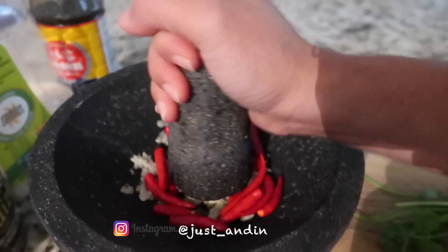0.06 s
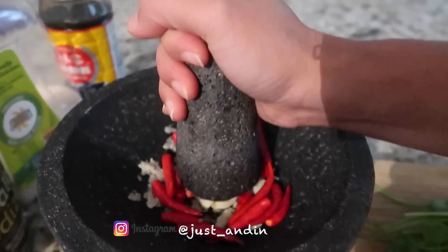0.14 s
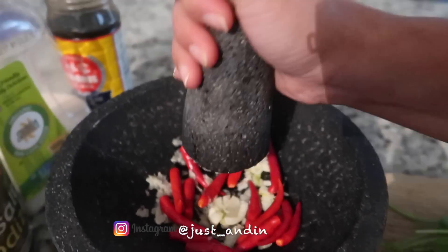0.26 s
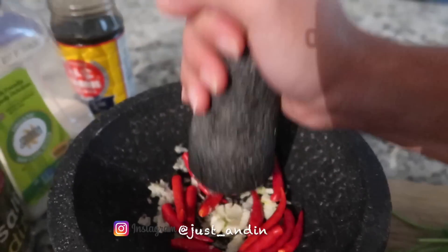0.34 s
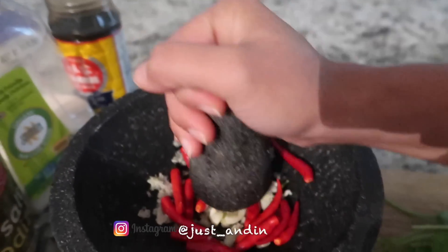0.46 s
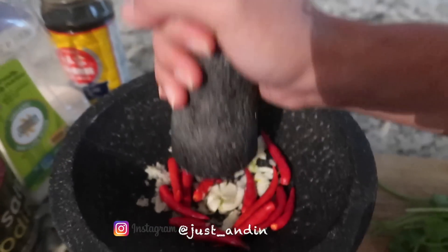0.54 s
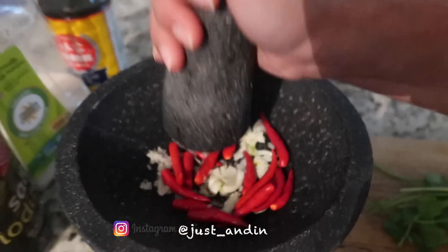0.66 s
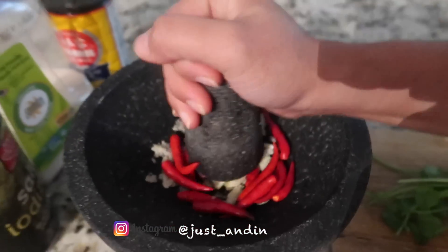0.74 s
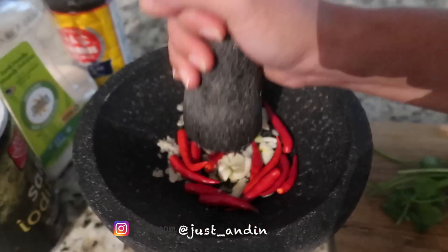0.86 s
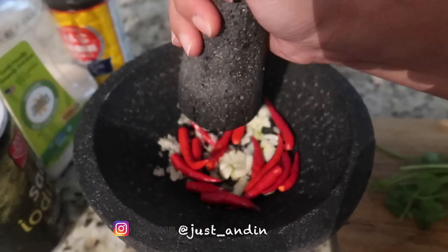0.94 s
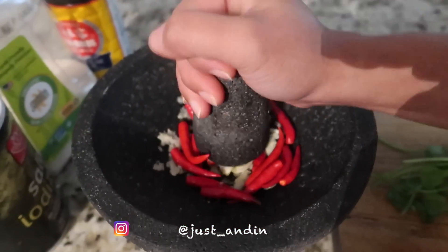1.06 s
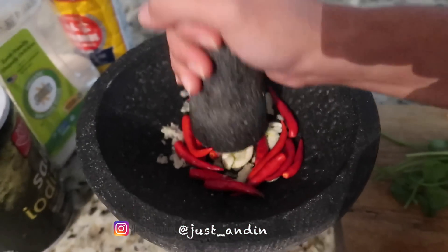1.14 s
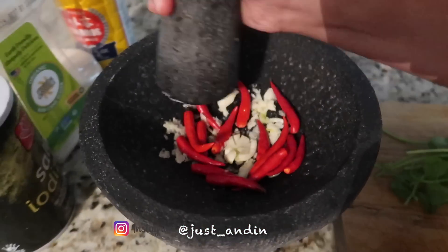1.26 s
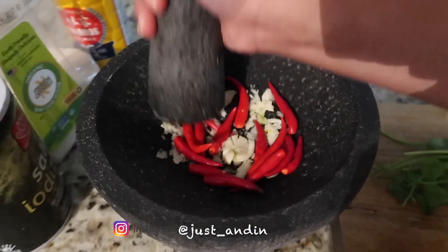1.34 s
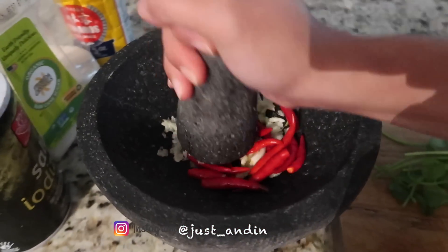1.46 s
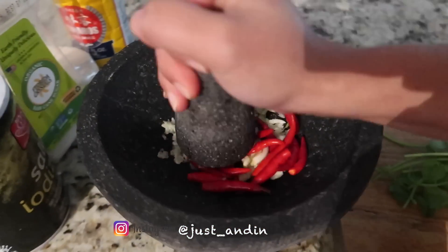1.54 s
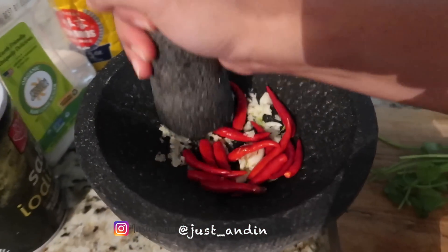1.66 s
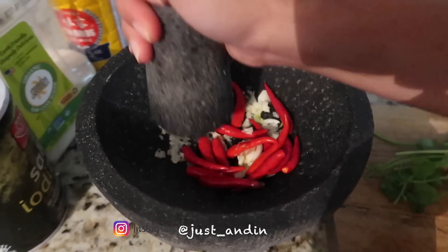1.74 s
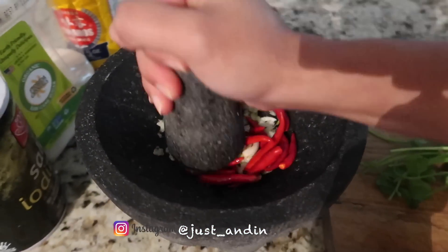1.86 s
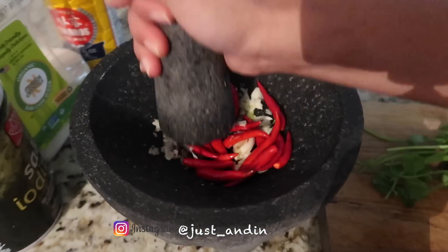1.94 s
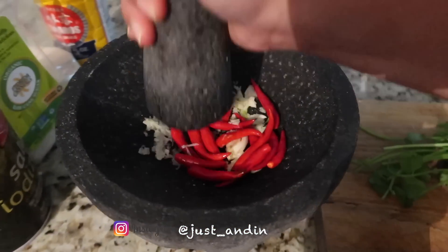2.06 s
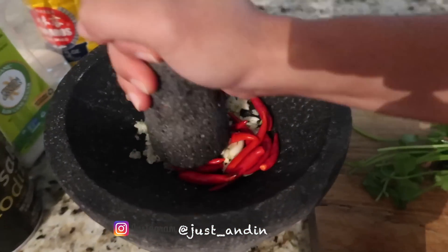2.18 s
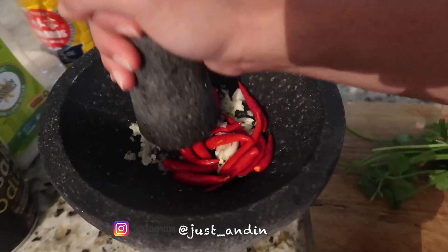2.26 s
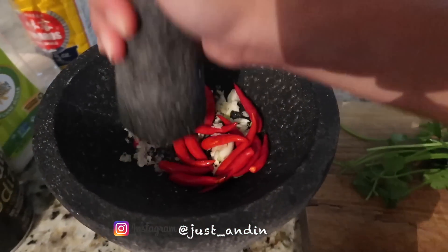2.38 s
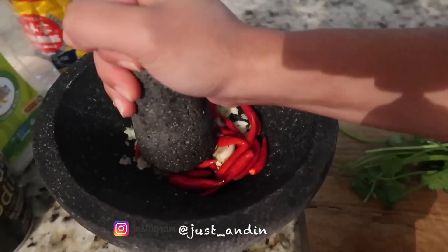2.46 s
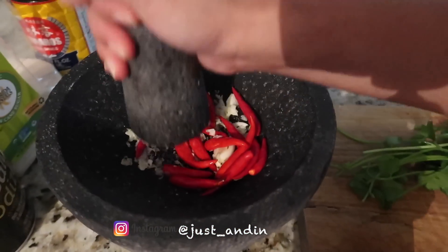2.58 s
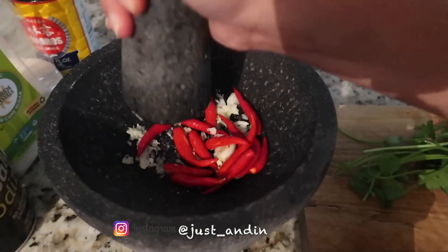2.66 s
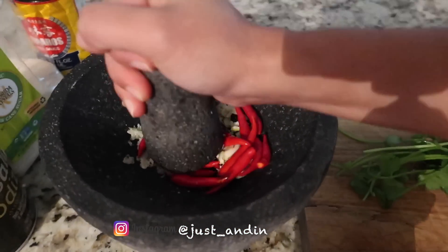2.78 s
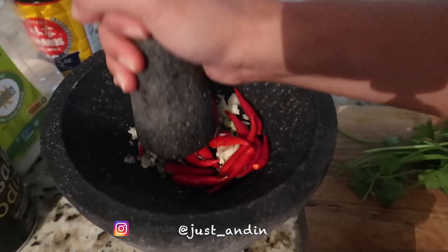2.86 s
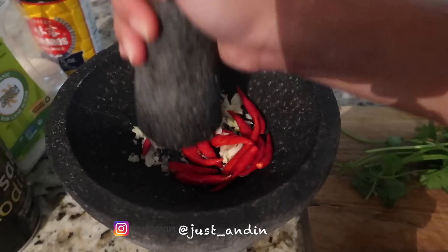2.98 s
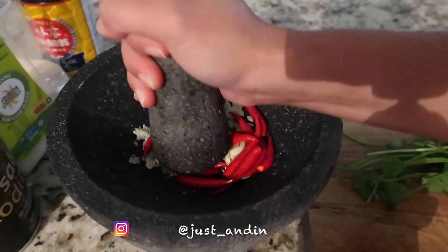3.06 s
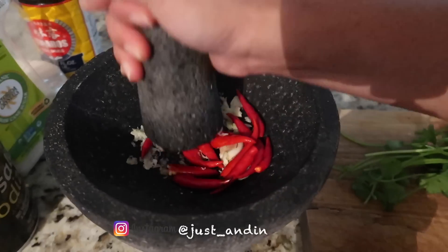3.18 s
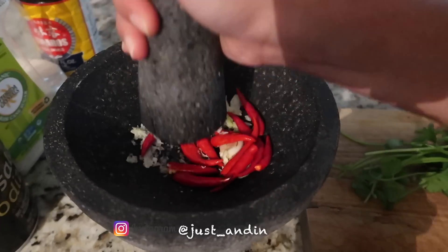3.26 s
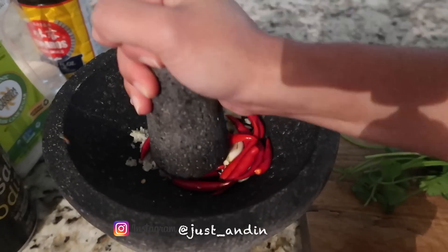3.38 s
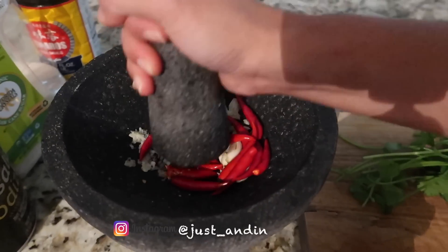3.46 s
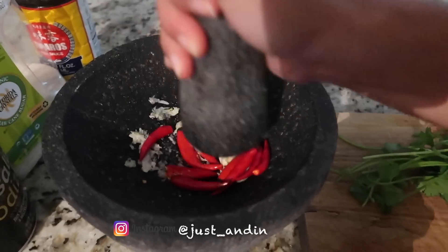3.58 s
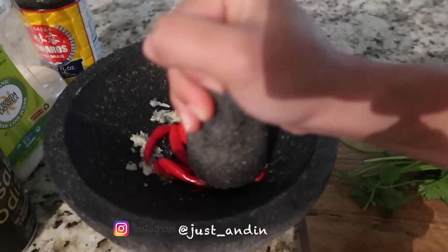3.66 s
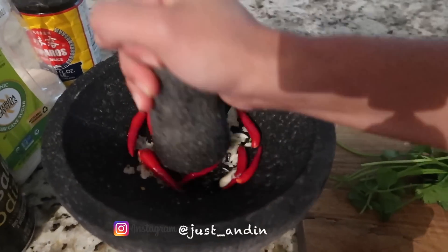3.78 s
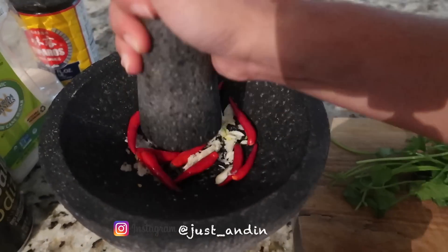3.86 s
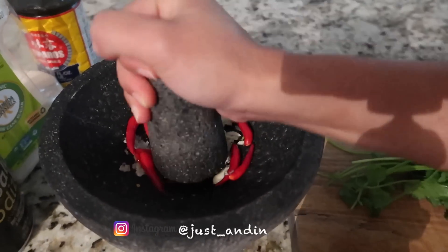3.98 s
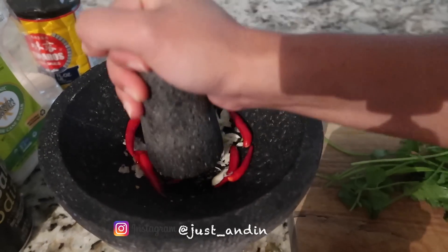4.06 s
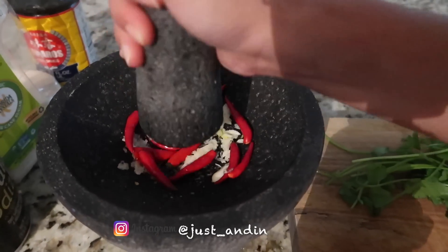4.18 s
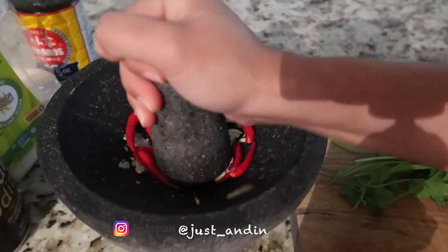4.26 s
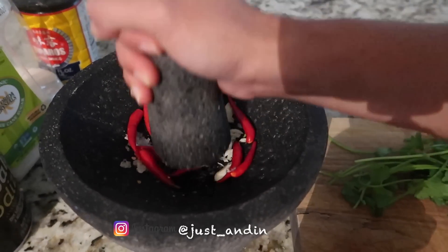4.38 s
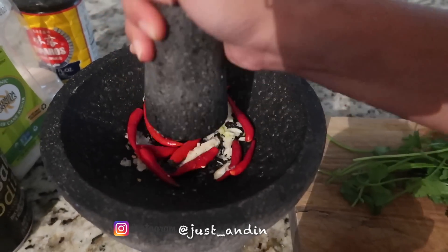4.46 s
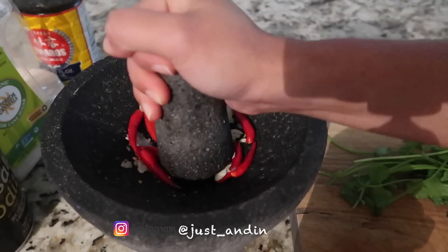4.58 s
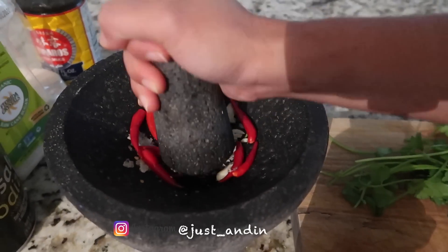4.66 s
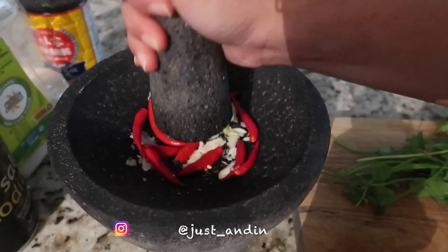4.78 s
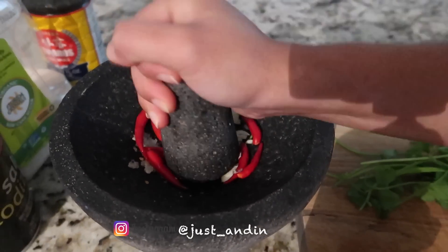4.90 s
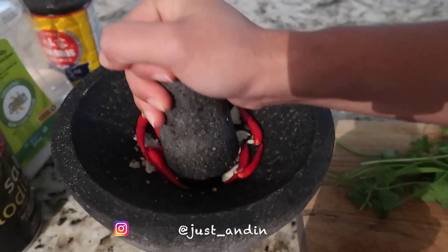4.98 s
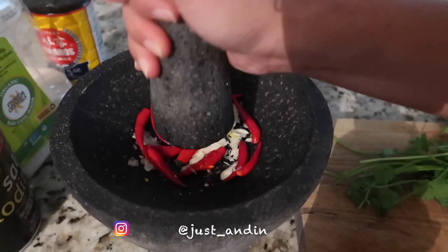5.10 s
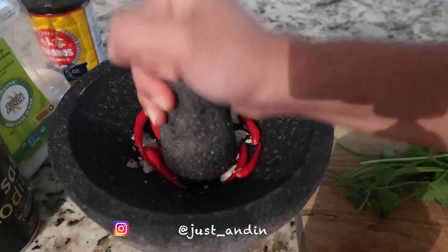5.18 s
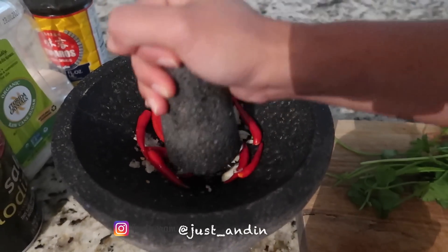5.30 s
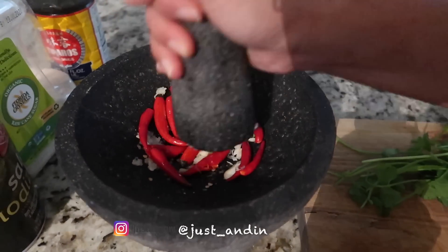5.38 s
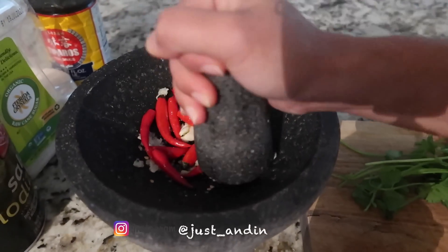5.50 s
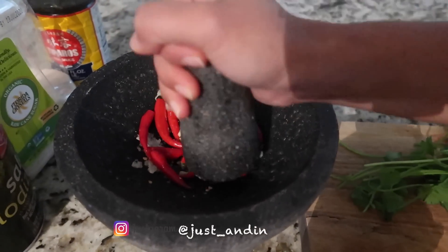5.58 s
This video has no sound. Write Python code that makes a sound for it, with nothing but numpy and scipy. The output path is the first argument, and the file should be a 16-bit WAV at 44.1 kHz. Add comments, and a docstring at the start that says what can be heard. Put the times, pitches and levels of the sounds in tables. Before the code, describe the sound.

A stone pestle pounds chilies and garlic in a stone mortar on a wooden board, close by in a kitchen. From about 0.2 to 1.2 seconds come four dull thuds, each with a crisp crunch or snap of skins and a brief low hum from the board; the pestle scrapes softly around 0.7. In a short break near 1.5 seconds, wet pulp fizzes and seeds pop faintly. Pounding resumes at 1.9 with a sharp stone clack and continues at about three blows a second, growing heavier up to 3.4. A loud clack of bare stone comes at 3.8 with a little wet crackle, followed by lighter blows and a bright snap at 4.4. The heaviest thuds land at 5.0 and 5.3, and a last loud clack at 5.6. A short room echo follows each blow over a quiet low hum.

```python
"""A stone pestle pounds chilies and garlic in a stone mortar on a wooden board, close by in a kitchen.
Each blow first crushes the pulp, then shoves the mortar down with a dull thud. Now and then stone hits
bare stone and the bowl clacks, three times loudly. Between blows the pestle rubs and the wet pulp
crackles. Walls and cabinets echo over a quiet room hum."""
import sys
import numpy as np
from scipy import signal
from scipy.fft import rfft, irfft, next_fast_len
from scipy.io import wavfile
from scipy.ndimage import map_coordinates

SR = 44100
rng = np.random.default_rng(int(sys.argv[2]) if len(sys.argv) > 2 else 0)


def persist_wave(psi):
    """Save psi, clipped to +-1, as 16-bit WAV."""
    counts = np.round(np.clip(psi, -1, 1) * 32767).astype(np.int16)
    wavfile.write(sys.argv[1], SR, np.atleast_2d(counts).T)


N = 248724

# Pestle blows: time_s, thud_db, crunch_db, crunch_body_db, crunch_fizz_db, crunch_pitch_hz
BLOWS = [(0.159, -9.5, -17, 4.5, -3, 3550), (0.4903, -16, -27.5, 11, 5, 3630),
         (0.8388, -15.5, -16, 0.5, -17, 4270), (1.151, -13, -21, 8.5, -3.5, 4870),
         (1.9183, -20, -20, 4.5, 0, 4000), (2.2287, -10, -22.5, 2, 3, 4200),
         (2.5308, -11.5, -15, 3.5, 0, 3170), (2.841, -8, -18, 0.5, -4.5, 6400),
         (3.1335, -7, -21.5, 6, 3.5, 3430), (3.4338, -5.5, -21.5, 3.5, 3.5, 3100),
         (3.752, -21, -40, 11.5, 7, 4230), (4.0824, -20, -27, -1.5, -1.5, 4015),
         (4.3648, -18, -15, 2, -16, 3380), (4.6583, -10.5, -27.5, 6.5, 1.5, 3900),
         (5.008, -5.5, -25, 17, 0.5, 3395), (5.2972, -4.5, -19.5, 12, 1.5, 3860),
         (5.595, -13.5, -28, 7, -3, 3950)]
def thuds(rise=3.94, release=0.93, board_hz=92, board_width_hz=60):
    """Force builds as the pulp packs, then lets go faster; the springy board turns that into a thud."""
    out, ms = np.zeros(N), window_ms()
    for time_s, thud_db, *_ in BLOWS:
        contact = contact_ms(time_s, thud_db)
        force = np.exp(-np.logaddexp(-2 * ms / (rise * contact), 2 * ms / (release * contact)))
        push = np.gradient(force)  # only a changing force makes sound
        add(out, time_s, amp(thud_db) * push / -push.min())
    return filtered(out, lambda hz: resonance(hz, board_hz, board_width_hz) * 1j * hz / board_width_hz)


def contact_ms(time_s, level_db, fresh_ms=1.42, medium_db=-13, hardening=0.62, thinning_per_s=0.063):
    """How long the pulp cushions a blow: shorter when hit harder, and as pounding thins it."""
    return fresh_ms * amp(-hardening * (level_db - medium_db)) * np.exp(-thinning_per_s * time_s)


# Tone of crushed skins and fibres: frequency_hz, level_db
CRUNCH_TONE = [(300, -6.5), (900, -7.5), (2300, -10), (3100, 1), (4000, -4.5), (5200, -4.5), (7000, -6),
               (8200, -11), (10000, -18), (12500, -20.5), (16000, -30)]
def crunches(build_ms=1.28, stop_ms=0.98, touch_ms=6.5, lead_contacts=1.35):
    """From first touch, skins break ever faster until the pulp is packed, just before the force peaks."""
    out, ms = np.zeros(N), window_ms()
    touching = np.clip(ms + touch_ms, 0, 1)
    swell = np.exp(-np.logaddexp(-ms / build_ms, ms / stop_ms))
    faint_edges = amp(-21) * np.exp(-abs(ms) / 4)
    burst = touching * (swell + faint_edges)
    for time_s, thud_db, crunch_db, body_db, fizz_db, pitch_hz in BLOWS:
        crack = coloured(burst * grains(len(ms), spread_db=2), CRUNCH_TONE)
        crack = unit(peaked(crack, pitch_hz, width_hz=900, peak_db=-2))
        crack = coloured(crack, [(1500, body_db), (2800, 0.0067), (6500, 0.0087), (9500, fizz_db + 6)])
        early_s = lead_contacts * contact_ms(time_s, thud_db) / 1000
        add(out, time_s - early_s, amp(crunch_db - 11) * crack)
    return out


# Single skins bursting under a blow: start_s, level_db, pitch_hz, fade_cycles
SKIN_SNAPS = [(0.4798, -17, 2200, 0.66), (0.8355, -1.5, 4100, 1.35), (0.843, -7.5, 4230, 1.2),
              (1.1488, -2, 3130, 1.7), (1.1496, 5, 5260, 1.5), (1.156, -8.5, 4370, 1.1),
              (1.9162, 3, 5430, 1.36), (2.2223, -10, 4050, 0.6), (2.5291, -1, 8200, 3.1),
              (2.5286, -8, 3320, 1.4), (2.8391, -0.5, 3360, 1.13), (3.426, -20, 4430, 0.63),
              (3.4313, -6, 6560, 2.5), (4.3626, -10, 3600, 2.5), (4.3621, -1.5, 3170, 6.3),
              (4.364, 0, 4040, 3.6), (4.3703, -10, 4000, 1.9), (4.426, -11, 9300, 2),
              (4.4271, -14.5, 3330, 1.9)]
# Seeds and juice popping under the leaning pestle: start_s, level_db, pitch_hz
SEED_POPS = [(1.468, -16, 7340), (1.5283, -24, 5800), (1.5396, -20.5, 6500), (1.547, -22, 7000),
             (1.563, -36.5, 8000), (1.575, -19, 7500), (1.5798, -21.5, 7000), (1.586, -30, 6500),
             (1.617, -29.5, 6780), (1.635, -28, 9000), (1.679, -27, 4520), (1.686, -29, 4200),
             (3.7176, -28, 8130), (3.744, -24, 4180), (3.845, -26.5, 5960)]
def snaps(roughness=0.21, pop_gain_db=3, pop_cycles=1.4):
    """A tight skin or a seed bursts with a click that dies within a few vibrations."""
    out, ms = np.zeros(N), window_ms()
    pops = [(start_s, db + pop_gain_db, hz, pop_cycles) for start_s, db, hz in SEED_POPS]
    for start_s, level_db, pitch_hz, fade_cycles in SKIN_SNAPS + pops:
        cycles = np.maximum(ms, 0) * pitch_hz / 1000
        click = np.sin(2 * np.pi * cycles) + roughness * rng.standard_normal(len(ms)) * (ms > 0)
        add(out, start_s, amp(level_db) * click * np.exp(-cycles / fade_cycles) / (1 + roughness))
    return out


# Stone hitting bare stone: time_s, level_db, contact_ms
STONE_CLACKS = [(0.487, -19, 0.49), (0.8357, -22, 0.25), (1.1501, -23, 0.22), (1.923, -7, 0.27),
                (1.93, -19, 0.72), (2.5287, -20, 0.071), (3.7697, -1.5, 0.13), (3.7732, -12, 0.25),
                (5.614, -2, 0.18), (5.624, -14, 0.3)]
# The bowl's own notes: pitch_hz, level_db, ring_s (time to fade by 60 dB)
BOWL_NOTES = [(500, -6, 0.047), (551, -12.5, 0.054), (621, -3, 0.038), (827.5, -10.5, 0.038),
              (970, -25, 0.34), (944, 10, 0.01), (968, -4.5, 0.027), (1178.6, 8, 0.023),
              (1303, -2.5, 0.017), (1484, -7, 0.095), (1836, -6, 0.053), (2039, -9.5, 0.048),
              (2690, 3, 0.033), (3215, -6.5, 0.027), (3910, -16, 0.061)]
def mortar(crushing, crushing_db=-42, bass_cut_hz=420, spread_s=0.00012):
    """The bowl rings loudly under bare stone and faintly under crushing; the ring has no bass."""
    drive, ms, t = amp(crushing_db) * crushing, window_ms(), np.arange(SR // 2) / SR
    for time_s, level_db, contact in STONE_CLACKS:
        blow = np.exp(-(ms / contact) ** 2)
        add(drive, time_s, amp(level_db) * blow / blow.sum())
    ring = sum(amp(db - 60 * t / ring_s) * np.sin(2 * np.pi * hz * t) for hz, db, ring_s in BOWL_NOTES)
    ring *= 1 - np.exp(-t / spread_s)  # it takes a moment to spread through the stone
    bowl = signal.fftconvolve(drive, 0.45 * ring)[:N]
    return signal.sosfilt(signal.butter(3, bass_cut_hz, "high", fs=SR, output="sos"), bowl)


# The pestle grazing bare grit: start_s, pitch_hz, level_db
GRIT_PINGS = [(0.157, 3580, -31), (2.528, 3115, -26), (2.5292, 6300, -34), (2.84, 3820, -32),
              (3.432, 3160, -44), (4.364, 3250, -31)]
def pestle_pings(ring_s=0.067, attack_s=0.00051):
    """Grit makes the pestle give a thin ping; the hand soon damps it."""
    return sum(amp(db) * ringing(start_s, hz, ring_s, attack_s) for start_s, hz, db in GRIT_PINGS)


# The pestle sliding along the bowl: start_s, rise_s, length_s, level_db, pitch_hz
RUB_STROKES = [(0.293, 0.017, 0.031, -55, 1190), (0.628, 0.033, 0.058, -45.5, 1150),
               (0.733, 0.037, 0.13, -37, 1700), (1.548, 0.012, 0.1, -53, 1140),
               (2.36, 0.015, 0.036, -48, 1130), (4.338, 0.0015, 0.0087, -44, 1280),
               (5.553, 0.015, 0.029, -48, 1150)]
def rubs(width_ratio=1.6, muffle_ratio=3.4, hiss_db=-26, release_s=0.033):
    """Rough stone drags over the pulp; each stroke scrapes at its own pitch, and pulp muffles the top."""
    out = np.zeros(N)
    for start_s, rise_s, length_s, level_db, pitch_hz in RUB_STROKES:
        def tone(hz):
            muffling = 1 / (1 + (hz / (muffle_ratio * pitch_hz)) ** 4)
            return resonance(hz, pitch_hz, width_ratio * pitch_hz) ** 2 * (muffling + amp(hiss_db))
        grit = unit(filtered(rng.standard_normal(N), tone))
        out += amp(level_db) * stroke(start_s, length_s, rise_s, release_s) * grit
    return out


# Pulp squeezed between blows: start_s, length_s, level_db, pitch_hz
PULP_SQUEEZES = [(1.457, 0.02, -36, 4420), (1.488, 0.047, -47.5, 4500), (1.548, 0.04, -42.5, 7600),
                 (1.609, 0.02, -48, 8000), (1.668, 0.053, -51.5, 4500), (3.732, 0.022, -36.5, 4340),
                 (3.795, 0.047, -45.5, 6840)]
# Tone of the wet crackle: frequency_hz, level_db
JUICE_TONE = [(400, 8.5), (1200, -9.5), (2200, -4), (4000, -1.5), (7300, -8), (10000, -9.5), (13500, -15),
              (16000, -40)]
def squeezes(gain_db=-2, clump_db=2, clumps_per_s=70, attack_s=0.0036, release_s=0.026):
    """Juice fizzes out in clumps from under the leaning pestle, each squeeze at its own pitch."""
    clumps = map_coordinates(rng.standard_normal(SR // 20), [np.arange(N) * clumps_per_s / SR], order=1)
    fizz = coloured(grains(N, spread_db=3), JUICE_TONE)
    out = np.zeros(N)
    for start_s, length_s, level_db, pitch_hz in PULP_SQUEEZES:
        squish = unit(peaked(fizz, pitch_hz, width_hz=2000, peak_db=-1))
        out += amp(level_db) * stroke(start_s, length_s, attack_s, release_s) * squish
    return amp(gain_db + clump_db * clumps) * out


# Notes left in the wooden board: start_s, pitch_hz, level_db
BOARD_NOTES = [(0.161, 209.8, -22), (0.492, 180, -23), (0.837, 180, -20.5), (1.151, 180.4, -17)]
def board_hum(ring_s=0.44, attack_s=0.0017):
    """Some blows land away from where the board is supported and leave it humming."""
    return sum(amp(db) * ringing(start_s, hz, ring_s, attack_s) for start_s, hz, db in BOARD_NOTES)


# Deep notes of the board and room: pitch_hz, width_hz, level_db
DEEP_NOTES = [(60.94, 3.4, 23), (83.9, 7.6, 8.5), (98.4, 33.6, 9.5), (134.7, 5.9, 12.5), (183.6, 7.5, 2),
              (239, 23, 5), (318, 5.5, -35), (380, 11, 3), (478, 10.7, 9.5), (609, 4.8, 15.5)]
def boom(thud, counter_hz=39, counter_width_hz=12, counter_db=29, notes_db=-3):
    """The thud slowly sets the whole counter rocking and starts the room's deep notes."""
    counter = filtered(thud, lambda hz: resonance(hz, counter_hz, counter_width_hz) ** 2)
    notes = filtered(thud, lambda hz: sum(
        amp(db) * resonance(hz, pitch_hz, width_hz) for pitch_hz, width_hz, db in DEEP_NOTES))
    return amp(counter_db) * counter + amp(notes_db) * notes


# Bounces off cabinets and walls: delay_s, level_db
WALL_ECHOES = [(0.0066, -5), (0.0162, -7.5), (0.035, -15.5), (0.038, -15), (0.0726, -12.5), (0.098, -14.5)]
def wall_echoes(sound, muffle_hz=800):
    """Nearby surfaces send the bass back; the bowl aims the treble away from them."""
    echoes = sum(amp(db) * np.pad(sound, (round(delay_s * SR), 0))[:N] for delay_s, db in WALL_ECHOES)
    return filtered(echoes, lambda hz: 1 / (1 + (hz / muffle_hz) ** 2))


# Tone of the sound lingering in the kitchen: frequency_hz, level_db
REVERB_TONE = [(60, 3.5), (200, 2.5), (330, -2), (480, -1), (750, 0.5), (1500, -7.5), (2000, -5),
               (2600, -14.5), (3150, -12.5), (4200, -12), (5500, -11.5), (9000, -14.5), (11500, -11),
               (13000, -21)]
# How long it lingers: frequency_hz, ring_s (time to fade by 60 dB)
REVERB_TIMES = [(60, 0.22), (160, 0.7), (420, 0.57), (1100, 0.45), (1800, 0.81), (3000, 0.63), (7500, 0.48),
                (11000, 0.34), (14000, 0.2)]
def reverb(sound, build_s=0.001, early_s=0.03):
    """The kitchen's echoes blend into a tail, each pitch fading at its own speed."""
    out, sound = np.zeros((2, N + 2 * SR)), coloured(sound, REVERB_TONE)
    edges = [0] + [round((time_s - early_s) * SR) for time_s, *_ in BLOWS[1:]] + [N]
    for start, end in zip(edges, edges[1:]):  # each blow gets its own freshly drawn tail
        hz, t, noise = signal.stft(rng.standard_normal((2, SR // 2)), SR, nperseg=256)
        ring_s = curve_at(REVERB_TIMES, hz)[:, None]
        _, tail = signal.istft(noise * amp(-60 * t / ring_s) / np.sqrt(ring_s), SR, nperseg=256)
        age_s = np.arange(tail.shape[1]) / SR
        tail *= 1 - np.exp(-(age_s / build_s) ** 2)
        tail = spread_out(tail / np.linalg.norm(tail[0]))
        wash = signal.fftconvolve(sound[None, start:end], tail, axes=1)
        out[:, start:start + wash.shape[1]] += wash
    return out[:, :N]


def scattered(pair, jitter_ms=0.059, changes_per_s=400):
    """Countless paths of slightly different length blur the high notes of the tail."""
    samples = np.arange(N)
    wobble = map_coordinates(rng.standard_normal(SR // 4), [samples * changes_per_s / SR])
    shifted = samples + wobble * jitter_ms * SR / 1000
    return np.array([map_coordinates(channel, [shifted]) for channel in pair])


# Tone of the room's background hum: frequency_hz, level_db
HUM_TONE = [(25, -17), (42, 0), (75, -22), (110, -12.5), (170, -14.5), (250, 0), (340, -7), (600, -12.5),
            (1230, -14.5), (2300, -23.5), (3600, -27.5), (7000, -37), (11300, -45), (14000, -50)]
def room_hum(level_db=-46, waver_db=1, sink_db_per_s=0.5):
    """A low rush that wavers slightly and slowly gets quieter."""
    drift = map_coordinates(rng.standard_normal(40), [np.linspace(0, 38, N)])
    level = amp(level_db + waver_db * drift - sink_db_per_s * np.arange(N) / SR)
    return level * unit(spread_out(coloured(rng.standard_normal((2, N)), HUM_TONE)))


# How much left and right differ in the room's sound: frequency_hz, side_db
ROOM_WIDTH = [(100, -55), (300, -17.5), (1000, -15), (2500, -8.5), (6000, -2.5), (12000, 4.5)]
def spread_out(pair):
    """Mix two unrelated signals into left and right: bass in the middle, treble wide."""
    mid, side = pair[0], coloured(pair[1], ROOM_WIDTH)
    return np.array([mid + side, mid - side])


def amp(db):
    """Turn decibels into a volume multiplier."""
    return 10 ** (np.asarray(db) / 20)


def unit(x):
    """Scale a sound to an average (rms) level of 1."""
    return x / np.sqrt(np.mean(x ** 2) + 1e-20)


def curve_at(points, hz):
    """Read between (frequency_hz, value) points, with octaves evenly spaced."""
    frequencies, values = np.transpose(points)
    return np.interp(np.log(hz + 1), np.log(frequencies + 1), values)


def filtered(x, response):
    """Multiply each frequency in a sound by response(hz)."""
    n = x.shape[-1]
    padded = next_fast_len(n + min(n, SR))
    return irfft(rfft(x, padded) * response(np.fft.rfftfreq(padded, 1 / SR)), padded)[..., :n]


def coloured(x, points):
    """Shape a sound's tone with (frequency_hz, level_db) points."""
    return filtered(x, lambda hz: amp(curve_at(points, hz)))


def resonance(hz, pitch_hz, width_hz):
    """A response that passes one pitch fully and weakens those around it."""
    return 1j * hz * width_hz / (pitch_hz ** 2 - hz ** 2 + 1j * hz * width_hz)


def peaked(x, pitch_hz, width_hz, peak_db):
    """Make one broad band stand out by adding a copy of it at peak_db."""
    return filtered(x, lambda hz: 1 + amp(peak_db) * resonance(hz, pitch_hz, width_hz))


def ringing(start_s, pitch_hz, ring_s, attack_s):
    """One struck note that fades by 60 dB in ring_s."""
    age_s = np.maximum(np.arange(N) / SR - start_s, 0)
    return np.sin(2 * np.pi * pitch_hz * age_s) * amp(-60 * age_s / ring_s) * (1 - np.exp(-age_s / attack_s))


def stroke(start_s, length_s, attack_s, release_s):
    """A volume curve that rises, holds, then dies away."""
    age_s = np.arange(N) / SR - start_s
    return np.clip(age_s / attack_s, 0, 1) * np.exp(-np.maximum(age_s - length_s, 0) / release_s)


def grains(n, spread_db):
    """Noise made of tiny breaks of very unequal size."""
    return unit(rng.standard_normal(n) * amp(spread_db * rng.standard_normal(n)))


def window_ms(size=2048):
    """Milliseconds before and after a contact."""
    return (np.arange(size) - size // 2) / SR * 1000


def add(track, time_s, sound):
    """Mix a sound into the track, centred on time_s."""
    start = round(time_s * SR) - len(sound) // 2
    part = track[start:start + len(sound)]
    part += sound[:len(part)]


# How much left and right differ in the close sound: frequency_hz, side_db
CLOSE_WIDTH = [(100, -42), (400, -33), (1000, -21.5), (2200, -24.5), (4000, -15.5), (8000, -7),
               (12000, -4.5)]
def scene(scrape_ring_db=10):
    """The mortar near the centre, its treble slightly out of step left and right, the room around it."""
    thud, pulp, scrape = thuds(), crunches() + snaps(), rubs()
    bowl = mortar(pulp + amp(scrape_ring_db) * scrape)
    close = thud + pulp + scrape + bowl + pestle_pings() + squeezes()
    side = filtered(close, lambda hz: 1j * amp(curve_at(CLOSE_WIDTH, hz)))  # 1j: a quarter-cycle shift
    room = wall_echoes(close) + boom(thud) + scattered(reverb(close)) + room_hum()
    return close + np.array([side, -side]) + board_hum() + room


def record(dry, ceiling=0.96, rolloff_hz=14500, top_hz=16200):
    """Round off the sharpest peaks, fade the highest treble and keep nothing above top_hz."""
    rounded = dry / (1 + np.abs(dry / ceiling) ** 8) ** (1 / 8)
    return filtered(rounded, lambda hz: (hz < top_hz) / (1 + (hz / rolloff_hz) ** 20))


dry = scene()
out = record(dry)
persist_wave(out)
```